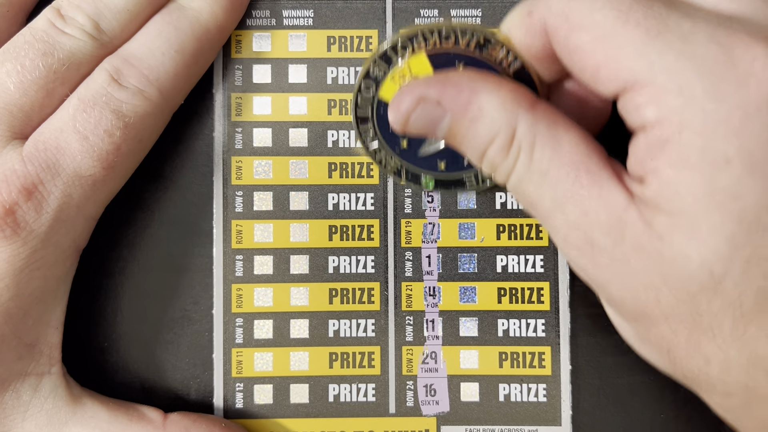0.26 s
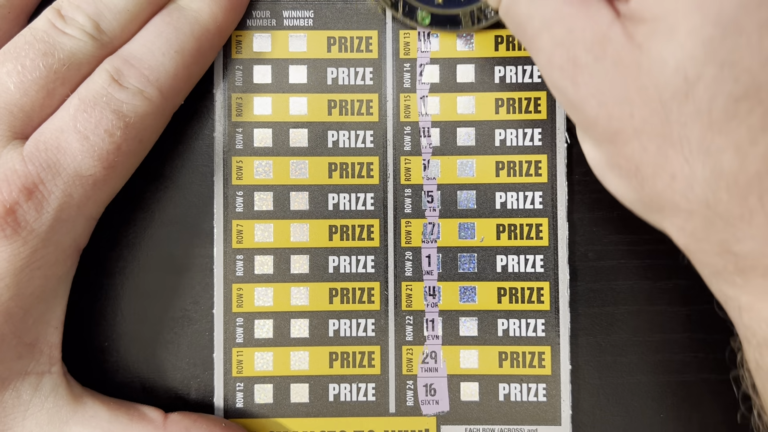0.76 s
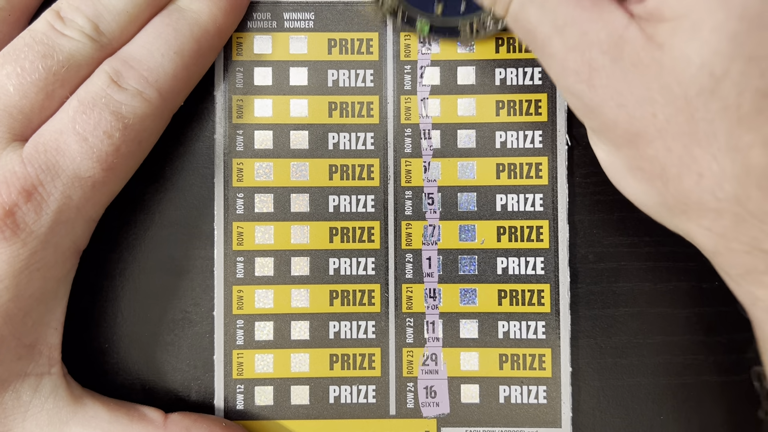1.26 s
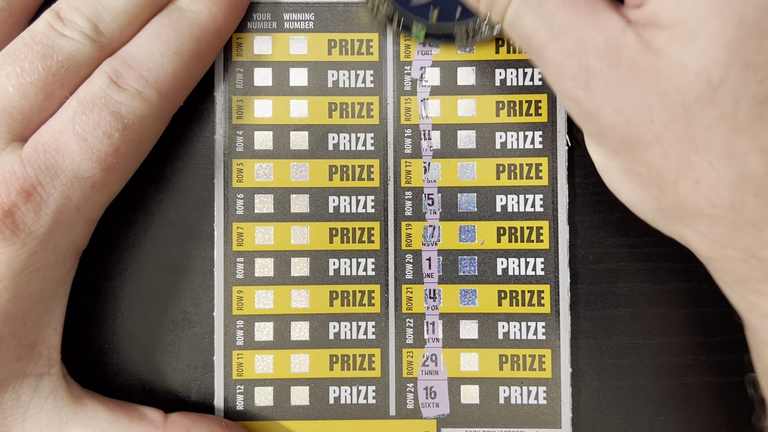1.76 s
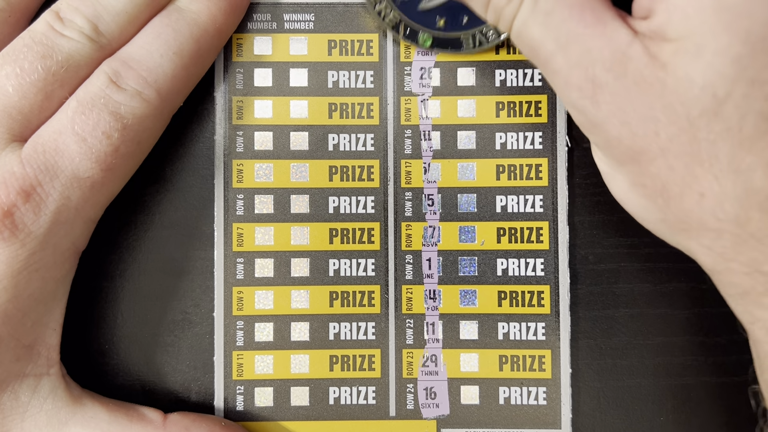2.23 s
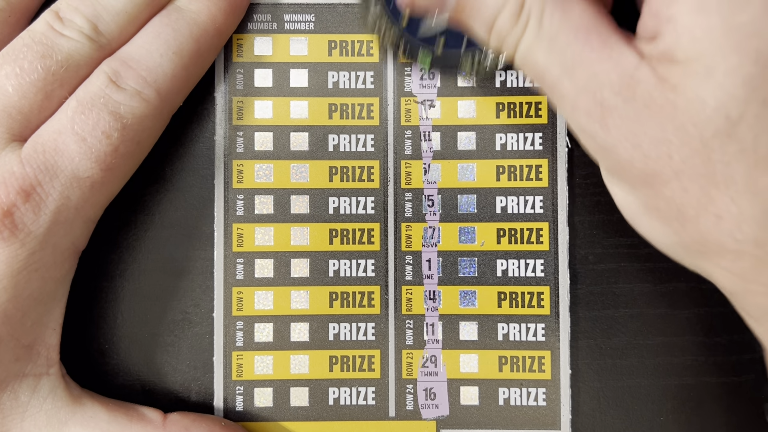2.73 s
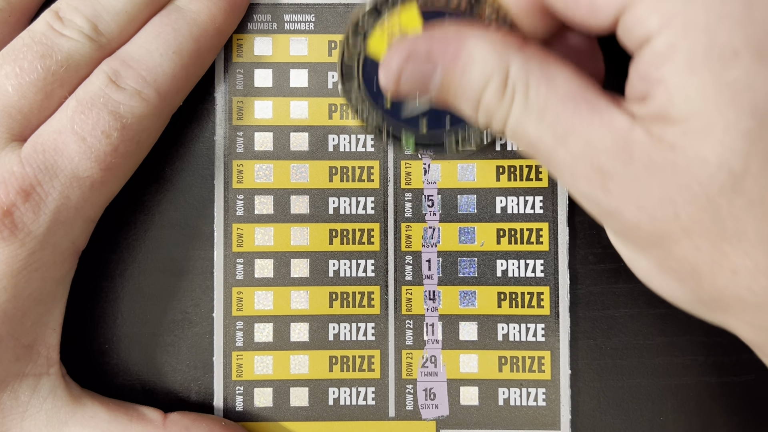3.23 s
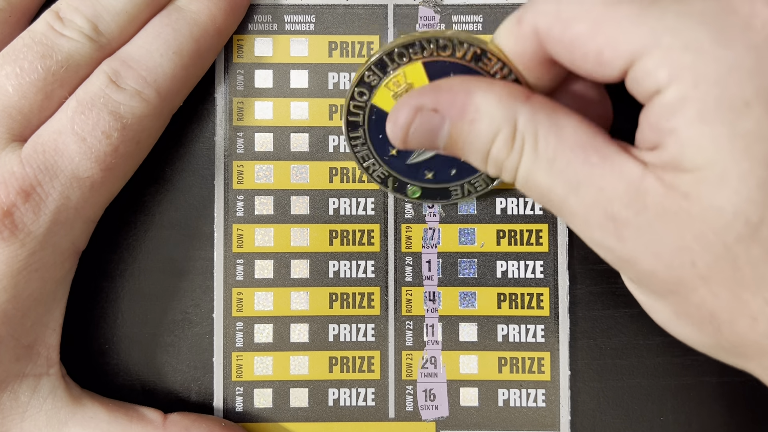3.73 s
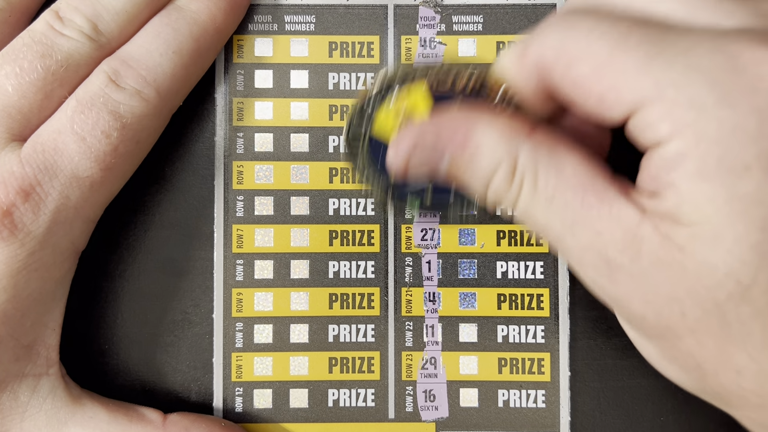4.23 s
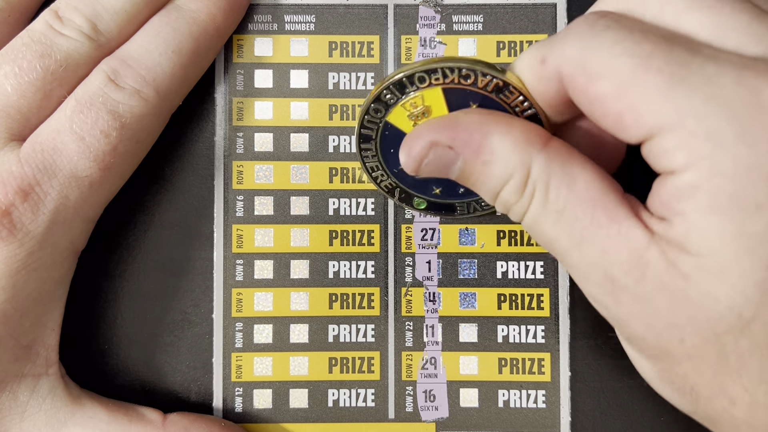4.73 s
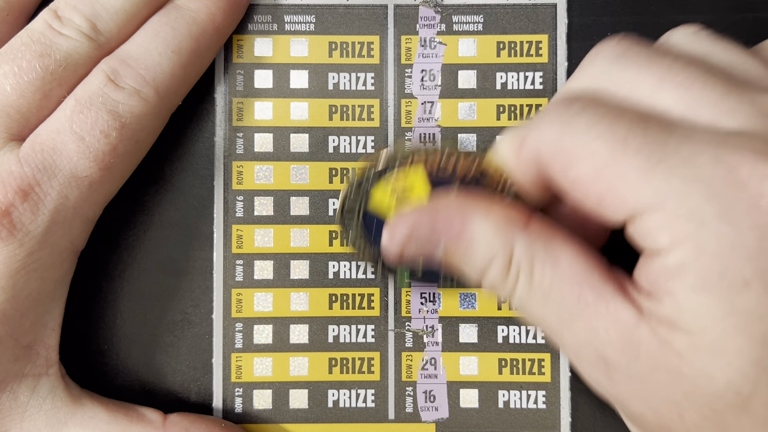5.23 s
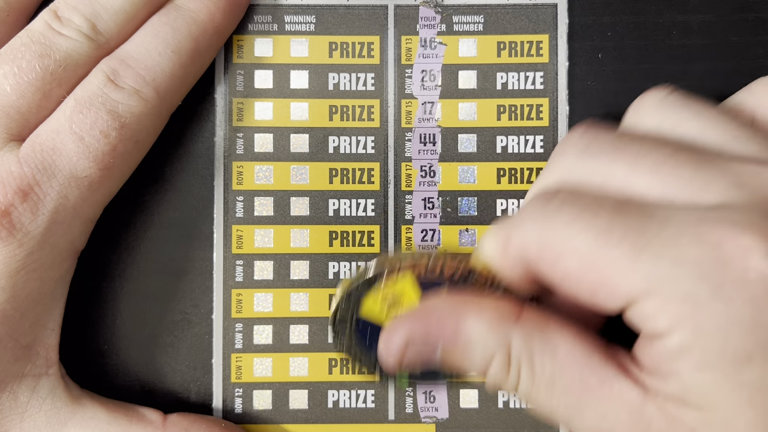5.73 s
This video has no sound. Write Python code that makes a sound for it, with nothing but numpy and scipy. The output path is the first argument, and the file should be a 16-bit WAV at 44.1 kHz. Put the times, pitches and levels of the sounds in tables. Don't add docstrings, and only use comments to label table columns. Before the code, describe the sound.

Close, dry scratching of a heavy coin on a card: one faint slide, a short near-silence, then rapid steady rubbing over a woody table.

```python
import sys
import numpy as np
from scipy import signal
from scipy.fft import rfft, irfft, next_fast_len
from scipy.io import wavfile
from scipy.ndimage import uniform_filter1d

SR = 44100
rng = np.random.default_rng(int(sys.argv[2]) if len(sys.argv) > 2 else 0)


def convert_level_to_amplitude(level_db):
    exponent = np.asarray(level_db, float) / 20
    return 10 ** exponent


def dump_mix(stems):
    frames = np.atleast_2d(stems).T
    limited = np.clip(frames, -1, 1)
    pcm = np.round(limited * 32767).astype(np.int16)
    wavfile.write(sys.argv[1], SR, pcm)


N = 264371
T = np.arange(N) / SR
PADDED = next_fast_len(N)
HZ = np.arange(PADDED // 2 + 1) * SR / PADDED + 1e-3

# time_s, place (0 top, 1 foot)
PLACE = [(0, 0.4), (.9, 0.21), (2.6, 0.1), (6, 0.7)]


def scrub():
    # start_s, swell_s, judder_db, grit_db, fine_over_grit_db
    strokes_away = [(1.117, .052, -38.5, -54.5, 2.5), (1.367, 0.043, -33.5, -54, -1),
                    (1.597, 0.032, -33.5, -43, -5), (1.826, 0.034, -31, -49, -8),
                    (2.056, 0.035, -36.5, -51.5, -3.5), (2.284, 0.03, -35, -46, -1.5),
                    (2.514, 0.034, -30, -46, -2), (2.723, 0.053, -28.5, -46.5, -9),
                    (2.968, 0.038, -28.5, -48.5, -11), (3.183, 0.042, -30.5, -40.5, -7.5),
                    (3.423, .039, -29, -43, -5), (3.642, 0.039, -29, -45, -10),
                    (3.857, 0.029, -27, -40, -3.5), (4.089, 0.044, -27.5, -38.5, -9),
                    (4.314, 0.041, -25, -44, -6), (4.55, 0.036, -25.5, -51.5, -6),
                    (4.774, .046, -26, -46, -9), (4.991, 0.051, -29.5, -45.5, -3),
                    (5.229, 0.057, -30.5, -45.5, -7), (5.461, 0.043, -30, -48.5, -1),
                    (5.684, 0.044, -28, -56, -8), (5.926, 0.041, -25, -56, -10)]
    strokes_back = [(1.041, 0.029, -52.5, -67.5, -5), (1.262, .026, -40.5, -55, -5),
                    (1.486, 0.028, -41, -53, 0), (1.715, .035, -40.5, -54.5, -3.5),
                    (1.955, 0.02, -36.5, -49, -3.5), (2.164, 0.055, -38, -51, -1),
                    (2.403, 0.05, -34, -49, -1.1), (2.637, 0.012, -36.5, -50.5, 0),
                    (2.851, 0.024, -35, -46, -3), (3.075, .025, -36, -48.5, -5),
                    (3.322, 0.02, -34, -52, -4.5), (3.536, 0.02, -33.5, -42, -3.5),
                    (3.757, 0.031, -34.5, -46, -6), (3.982, 0.008, -33.5, -49.5, -6),
                    (4.207, 0.027, -30, -50.5, -2), (4.44, 0.017, -33, -56, -4),
                    (4.676, 0.02, -33, -50.5, 1.5), (4.906, 0.013, -34.5, -54.5, -6),
                    (5.114, 0.041, -35.5, -45.5, 0), (5.364, 0.015, -35, -49.5, 0),
                    (5.59, 0.034, -33, -54.5, 1), (5.808, 0.016, -30.5, -54, -8)]
    judder_lag_s, judder_lead_s, judder_fall_s = (-0.0083, 0.0073), (0.012, 0.015), (0.041, 0.031)
    tear_rise_share, tear_fall_s = (0.75, 1.12), (0.037, 0.04)
    card_over_db, bite_over_db = (-14.5, -7.5), (13.5, 13.5)
    ring_hz, ring_db = (4094, 4350), (-10.5, -4.5)
    fall_per_gap = 0.45
    card_follows = 0.11

    rows = sorted([(*row, 0) for row in strokes_away] + [(*row, 1) for row in strokes_back])
    next_starts = [row[0] for row in rows[1:]] + [N / SR + 0.033]
    push, tear, snags, ring = [], [], [], []
    for (start, swell, judder_db, grit_db, fine_db, way), after in zip(rows, next_starts):
        middle = start + swell
        longer = fall_per_gap * (after - middle - 0.08)
        lag = judder_lag_s[way]
        rise = swell + lag + judder_lead_s[way]
        flex_over_db = card_over_db[way] + card_follows * (grit_db - judder_db + 16)
        push.append((middle + lag, rise, judder_fall_s[way] + longer, judder_db, flex_over_db))
        tear.append((middle, swell * tear_rise_share[way], tear_fall_s[way] + longer, grit_db, fine_db))
        snags.append((start, judder_db + bite_over_db[way]))
        ring.append((middle, ring_hz[way], ring_db[way]))
    return push, tear, snags, ring


def strokes(rows, drag_db, drag_over_db, bite, fade, creep_db):
    low, high = convert_level_to_amplitude(drag_db), convert_level_to_amplitude(drag_db + drag_over_db)
    for middle, rise, fall, db, over_db in rows:
        near = slice(int((middle - 0.15) * SR), int((middle + 0.2) * SR))
        late = T[near] - middle
        away = np.abs(late) / np.where(late < 0, max(rise, 0.005), max(fall, 0.005))
        swell = convert_level_to_amplitude(db - 19.24 * away ** np.where(late < 0, bite, fade))
        swell = swell + convert_level_to_amplitude(db + creep_db - 9.2 * away ** 2)
        low[near] += swell
        high[near] += swell * convert_level_to_amplitude(over_db)
    return low, high


def table_and_card(judder, flex, catches):
    # centre_hz, width_hz, level_db, lean (1 left port only, -1 right only), top_to_foot_db
    table_modes = [(67.5, 3.7, -23, .05, .1), (141.8, 10.8, -14, 0.054, 0.091),
                   (263.3, 16.5, -9, 0.18, 0.05), (301.3, 28, -4.5, 0.016, 0.076), (349, 49, -4, 0.055, .1),
                   (420.7, 30.3, -7, -0.053, 0.16), (490, 26, -8.5, 0.51, 0.46),
                   (541.5, 38, -5, -0.029, .1), (590.3, 56, -0.5, -0.056, 0.12),
                   (645.4, 46, 1.76, -0.026, 0.11), (719.7, 44.5, -5.5, -0.6, 0.091)]
    card_modes = [(798, 55, -1, 0.21, 3.8), (967, 72, 2.5, 0.65, 0.5), (1050, 69, 3, 0.041, 4),
                  (1166, 68, -0.5, 0.082, 16), (1325, 210, -8, 0.08, 6), (1478, 70, -12, -1, -19),
                  (1790, 240, -10.5, 0.12, 5)]
    # time_s, gain_db
    deep_bending = [(.1, 4.5), (.5, -1.7), (.85, 3), (.97, 14), (1.2, 0), (3.9, 0), (4.1, -3.5),
                    (5.99, -3.5)]
    lumps = convert_level_to_amplitude(2.0 * drift(47.0))
    push = bursts(catches, decay_s=0.00025)
    scrape = bursts(catches, decay_s=0.0019) * rng.standard_normal(N)
    snags = convert_level_to_amplitude(0.5) * push + convert_level_to_amplitude(-6.5) * scrape
    table_force = grains(3000, spread_db=2.5) * judder * lumps + convert_level_to_amplitude(-12.5) * snags
    card_force = grains(2500, spread_db=4.5) * flex * lumps + convert_level_to_amplitude(-23.5) * snags
    deep_db = np.interp(T, *np.transpose(deep_bending))
    return modes(table_force, table_modes, deep_db) + modes(card_force, card_modes)


def modes(force, table, deep_db=0):
    place = np.interp(T, *np.transpose(PLACE)) - 0.5
    out = 0
    for k, (hz, width, db, lean, moved_db) in enumerate(table):
        is_deep = hz < 455
        mode_db = db + moved_db * place + deep_db * is_deep
        strength = (-1) ** k * convert_level_to_amplitude(mode_db) / np.sqrt(np.pi * width / SR)
        out = out + strength * resonance(force, hz, width) * np.array([[1 + lean], [1 - lean]])
    return out / np.sqrt(np.sum(convert_level_to_amplitude(np.array(table)[:, 2]) ** 2) / 2)


def resonance(x, hz, width_hz):
    r = np.exp(-np.pi * width_hz / SR)
    poles = [1, -2 * r * np.cos(2 * np.pi * hz / SR), r * r]
    return signal.lfilter(np.array([1, 0, -1]) * (1 - r * r) / 2, poles, x)


def bursts(events, decay_s):
    s, db = np.transpose(events)
    marks = np.full(N, 1e-18)
    marks[(s * SR).astype(int)] = convert_level_to_amplitude(db)
    return signal.lfilter([1], [1, -np.exp(-1 / (decay_s * SR))], marks)


def grains(per_s, spread_db):
    sizes = convert_level_to_amplitude(spread_db * np.minimum(rng.exponential(1, N), 4)) * rng.choice([-1, 1], N)
    return rms_one(sizes * (rng.random(N) < per_s / SR))


def drift(rate):
    r = np.exp(-40 * np.pi * rate / SR)
    slow = signal.lfilter([1], [1, -2 * r, r * r], rng.standard_normal(N // 20 + 2002))[2000:]
    return np.interp(np.arange(N) / 20, np.arange(len(slow)), rms_one(slow))


def rms_one(x):
    return x / np.sqrt(np.mean(x ** 2) + 1e-20)


def coating(grit, fine, ring):
    # time_s, peak_db
    flakes = [(0.22, -41), (0.299, -31.5), (1.2587, -36.5), (1.8707, -34), (1.956, -30), (2.0566, -33.5),
              (2.774, -34), (2.8492, -34), (2.8729, -31.5), (3.0155, -27), (3.0814, -32), (3.1951, -30.5),
              (3.4636, -32), (3.5344, -31.5), (3.8821, -39), (3.985, -29.5), (4.1215, -25.5), (4.2162, -24),
              (5.619, -38), (4.4306, -40.5), (4.6856, -46), (4.8225, -31), (5.026, -32), (5.2726, -32),
              (5.5017, -34), (5.5975, -30), (5.642, -34), (5.707, -30.5), (5.872, -48)]
    # centre_hz, width_hz, over_hiss_db, top_to_foot_db
    coin_modes = [(1980, 370, -2, -13), (2590, 96, 10, -3.5), (2907, 26, 1.5, -22), (3220, 300, 5.5, 13.5),
                  (5140, 480, -1.5, 30), (6430, 1800, 0, 33), (7950, 400, 4.5, 12.5)]
    # frequency_hz, density_db_per_hz
    grit_spectrum = [(900, 19), (1400, 10.5), (2200, 7.5), (3700, 3.7), (5000, 1.5), (7000, -0.5),
                     (8800, 5.5), (10300, 11), (12000, 1.5), (13800, -1), (14600, -4.5)]
    cavity_hz = [9520, 15200]
    # width_hz, level_db
    cavity_peaks = [(400, -2), (500, 15)]
    snap_spread_s = 0.0053

    lumps = convert_level_to_amplitude(2.66 * drift(39.6))
    snaps = convert_level_to_amplitude(-10) * uniform_filter1d(bursts(flakes, decay_s=0.0027), int(snap_spread_s * SR) + 1)
    place = np.interp(T, *np.transpose(PLACE)) - 0.5

    torn = np.array([grains(16000, spread_db=-0.5), grains(17000, spread_db=-8.5)])
    torn = coloured(torn, [(500, 36)] + grit_spectrum)
    coin = 0
    for hz, width, db, moved_db in coin_modes:
        grip = convert_level_to_amplitude(3 * drift(5))
        coin = coin + convert_level_to_amplitude(db + moved_db * place) * grip * resonance(torn, hz, width)
    torn = torn + coin
    torn = torn + sum(convert_level_to_amplitude(db) * resonance(torn, hz, width) for hz, (width, db) in zip(cavity_hz, cavity_peaks))

    lower = patchy(torn, np.geomspace(700, 8250, 16), patchy_db=3.2, rate=10)
    upper = patchy(torn, np.geomspace(8250, 17000, 8), patchy_db=3.2, rate=14)
    middle = signal.sosfilt(signal.butter(4, 2000, "high", fs=SR, output="sos"), lower)
    lower = lower / np.std(middle) + coin_ring(ring, width_hz=280) * [[1], [0.5]]
    fine_gain = fine * lumps * convert_level_to_amplitude(2.6 * drift(22)) + convert_level_to_amplitude(2.5) * snaps
    hiss = lower * (grit * lumps + snaps) + rms_one(upper) * fine_gain
    return ports(hiss + room(hiss), unlike=0.19)


def coin_ring(ring, width_hz):
    s, hz, db = np.transpose(ring)
    r = np.exp(-np.pi * width_hz / SR)
    clicks = [grains(3000, spread_db=-3.5), grains(3000, spread_db=3.0)]
    slow = signal.lfilter([1], [1, -2 * r, r * r], clicks)
    turn = 2 * np.pi * np.cumsum(np.interp(T, s, hz)) / SR
    flicker = convert_level_to_amplitude(np.interp(T, s, db) + 2.5 * drift(15))
    return rms_one(slow[0] * np.cos(turn) + slow[1] * np.sin(turn)) * flicker


def patchy(x, edges_hz, patchy_db, rate):
    out = 0
    for k, pair in enumerate(zip(edges_hz, edges_hz[1:])):
        band = signal.butter(2, pair, "band", fs=SR, output="sos")
        out = out + (-1) ** k * signal.sosfilt(band, x) * convert_level_to_amplitude(patchy_db * drift(rate))
    return out


def coloured(x, spectrum):
    hz, db = np.transpose(spectrum)
    return irfft(rfft(x, PADDED) * convert_level_to_amplitude(np.interp(np.log(HZ), np.log(hz), db)), PADDED)[..., :N]


def ports(x, unlike):
    # frequency_hz, left_lead_rad
    port_phase = [(0, 0), (1030, .3), (1460, 1.8), (1720, .2), (2240, -.1), (2840, 1.1), (3900, .3),
                  (5500, -.9), (6500, -.1), (7300, 0), (9300, -2.6), (9850, -3.1), (10550, -3.2),
                  (12500, -6.2), (13300, -6.4), (15400, -9.3)]
    hz, lead = np.transpose(port_phase)
    low = np.interp(HZ, [5500, 6800], [1, 0])
    half = np.exp(0.5j * np.interp(HZ, hz, lead)) * convert_level_to_amplitude(0.82 * low)
    mid, side = rfft(x, PADDED)
    side = side * unlike * (0.37 + 1.2 * low)
    return irfft(np.array([(mid + side) * half, (mid - side) / half]), PADDED)[:, :N]


def room(x):
    t60_s, level_db = 0.25, -17.5
    t = T[:SR // 2]
    cloud = rng.standard_normal((2, len(t))) * convert_level_to_amplitude(-60 * t / t60_s) * (t > 0.004)
    cloud = signal.lfilter([0.4], [1, -0.6], cloud)
    short_waves = signal.butter(2, 450, "high", fs=SR, output="sos")
    cloud[1] = cloud[0] + signal.sosfilt(short_waves, cloud[1] - cloud[0])
    cloud = cloud / np.sqrt(np.sum(cloud ** 2, axis=1, keepdims=True))
    return convert_level_to_amplitude(level_db) * signal.fftconvolve(x, cloud, axes=1)[:, :N]


def background():
    # time_s, level_db
    hand = [(0.0, -30.5), (0.2, -49), (0.32, -38), (0.57, -49), (0.67, -39), (0.93, -57), (1.05, -48.5),
            (5.29, -42), (5.99, -52)]
    # frequency_hz, density_db_per_hz
    rumble_spectrum = [(15, -47), (25, 0.5), (86, -6.5), (129, 6.5), (154, 2), (204, -5.5), (230, -21.5),
                       (300, 6), (510, -120)]
    # frequency_hz, density_db_per_hz
    air_spectrum = [(120, -37), (200, 17), (591, -31), (864, 9), (1660, 4), (2650, -29), (4310, -36),
                    (15000, -71)]
    mid, side, left, right = rng.standard_normal((4, N))
    lean = convert_level_to_amplitude(np.interp(T, *np.transpose(hand)) - 3.0 + 3.1 * drift(11.0))
    rumble = rms_one(coloured(mid + 0.14 * side * np.array([[1], [-1]]), rumble_spectrum)) * lean
    air = rms_one(coloured(np.array([left + 0.35 * right, right + 0.2 * left]), air_spectrum))
    return rumble + convert_level_to_amplitude(-68.5) * air


def scene():
    # time_s, judder_db, grit_db, fine_over_grit_db
    drag = [(0.02, -54, -47, -5), (0.059, -33, -57, -13), (0.09, -47, -68, -10), (0.2, -39.5, -57, -7),
            (0.225, -39.5, -53, -7), (0.3, -40.5, -47.5, -2), (0.48, -40.5, -61, -2),
            (0.7, -41.5, -54.5, -3), (0.845, -46.5, -57.5, -8)]
    # time_s, dip_db
    hesitations = [(0.206, -12), (0.359, -8), (0.461, -9), (0.59, -10), (0.62, -5)]
    # middle_s, rise_s, fall_s, judder_db, card_over_judder_db
    settle = [(.985, 0.031, 0.02, -78, -8)]
    # time_s, peak_db
    inner_snags = [(0.022, -20), (0.299, -27), (1.606, -13.5), (2.751, -6.5), (2.971, -11), (3.652, -13),
                   (3.871, -10), (3.892, -28), (4.092, -6), (4.122, -28), (4.239, -11), (4.322, -13),
                   (4.359, -0.5), (4.454, -15), (1.369, -23), (1.829, -14), (1.957, -18), (4.575, -4),
                   (4.795, -4.5), (4.923, -5.5), (5.012, -6.5), (5.252, -10), (5.274, -9), (5.47, -12),
                   (5.598, -16.5), (5.712, -7), (5.813, -15), (5.837, -9), (5.946, -5.5)]
    # time_s, pitch_hz, over_grit_db
    drag_ring = [(0.02, 4210, -9.5), (0.47, 4290, -5.5), (0.61, 4350, -6), (0.64, 4530, -0.5),
                 (0.9, 4460, 0.5), (0.96, 4428, -17)]
    hesitation_s = 0.0094
    lift_s, lift_db, sag_db_per_s, lift_fine_db = 0.023, -24.5, -70, 12

    s, *columns = np.transpose(drag)
    judder_db, grit_db, fine_db = [np.interp(T, s, c) for c in columns]
    flex_db = 10 + 0.64 * (grit_db - judder_db)
    since_lift = np.maximum(T - s[-1], 0)
    lifted = np.minimum(since_lift / lift_s, 1)
    gain_db = lift_db * lifted + sag_db_per_s * since_lift
    gain_db = gain_db + sum(db * np.exp(-((T - at) / hesitation_s) ** 2) for at, db in hesitations)
    fine_db = fine_db + lift_fine_db * lifted

    push, tear, snags, ring = scrub()
    judder, flex = strokes(settle + push, judder_db + gain_db, flex_db, bite=4.0, fade=2.07, creep_db=-20.5)
    grit, fine = strokes(tear, grit_db + gain_db, fine_db, bite=1.7, fade=1.4, creep_db=-21)
    wood = table_and_card(judder, flex, inner_snags + snags)
    torn = coating(grit, fine, drag_ring + ring)
    return wood + room(wood) + torn + background()


def top_cut(x):
    return signal.sosfilt(signal.butter(12, 16640, fs=SR, output="sos"), x)


def record(dry):
    cutoff_hz, start_s, open_s = 15750, 0.0205, 0.001
    cut = signal.sosfilt(signal.cheby2(14, 50, cutoff_hz + 500, fs=SR, output="sos"), dry)
    cut = signal.sosfilt(signal.butter(4, 44, "high", fs=SR, output="sos"), cut)
    closed = np.clip((start_s - T) / open_s + 1, 0, 1)
    return top_cut(cut * convert_level_to_amplitude(-24.5 * closed))


dry = scene()
out = record(dry)
dump_mix(out)
```